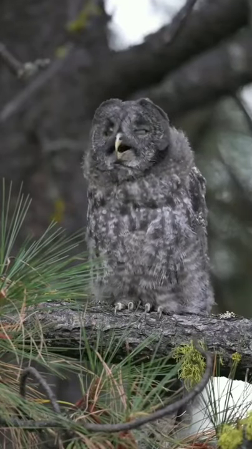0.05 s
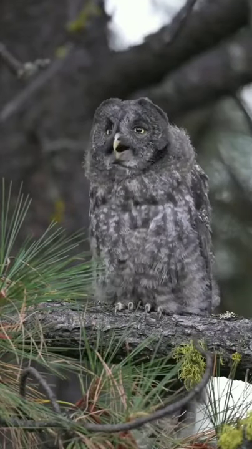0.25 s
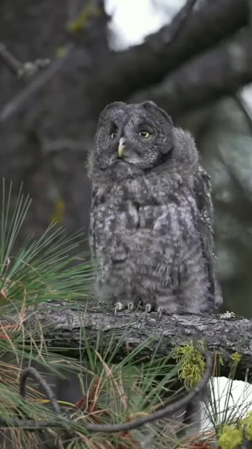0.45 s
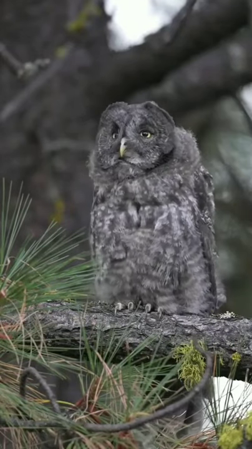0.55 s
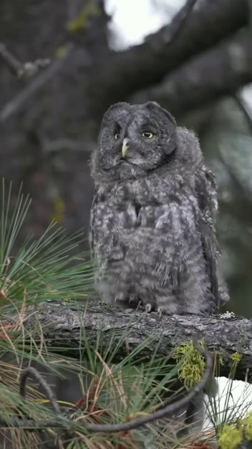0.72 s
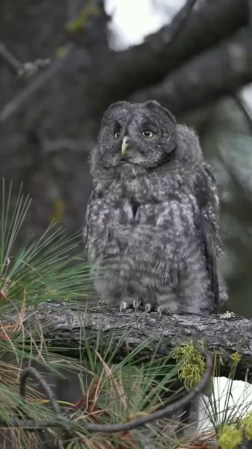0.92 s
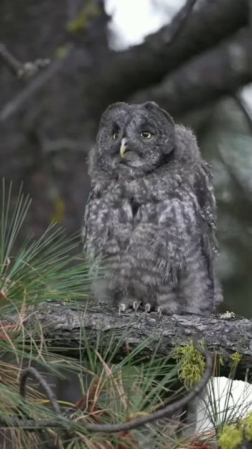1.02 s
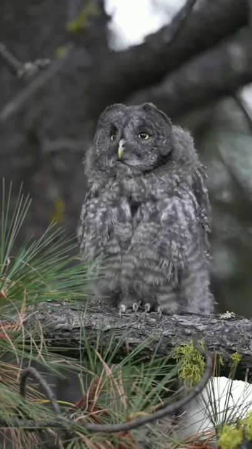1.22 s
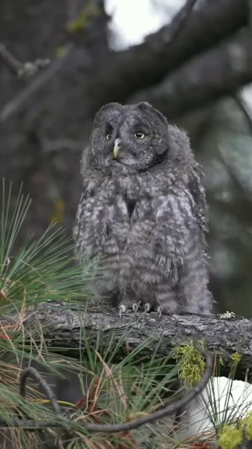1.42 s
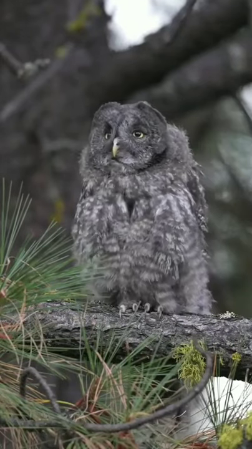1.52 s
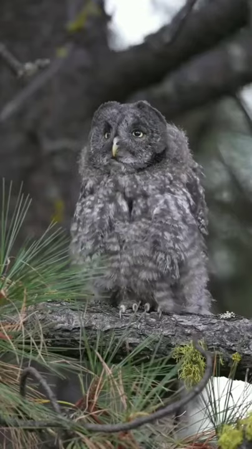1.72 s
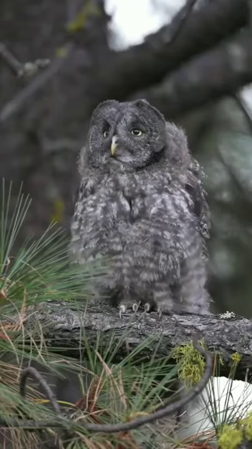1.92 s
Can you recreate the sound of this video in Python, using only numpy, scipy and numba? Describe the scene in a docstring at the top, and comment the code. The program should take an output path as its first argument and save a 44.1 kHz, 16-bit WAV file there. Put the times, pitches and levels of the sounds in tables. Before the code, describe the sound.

One raspy young owl screech rises into a thin squeal in quiet woods.

```python
"""Faint hiss and a low, wavering far-off drone sound throughout. Early on, a young owl gives one rasping
screech from a pine branch, with air hissing through the open beak. Its rough voice climbs slowly, breaks
up into a thin squeal as the odd harmonics fade, and drops away. A very short stereo smear widens the
call's high treble, and the woodland echoes briefly. A slight rustle comes at the end."""
import sys
import numpy as np
from scipy import signal
from scipy.fft import rfft, irfft
from scipy.io import wavfile
from scipy.ndimage import uniform_filter1d, map_coordinates
from numba import njit

SR = 44100
rng = np.random.default_rng(int(sys.argv[2]) if len(sys.argv) > 2 else 0)


def wrap_up_sound(samples):
    """Save the sound to the file named by the first command line argument, as 16-bit audio."""
    columns = np.atleast_2d(samples).T
    # keep every value between -1 and 1, then stretch to whole-number steps
    tamed = np.clip(columns, -1, 1)
    steps = np.round(tamed * 32767).astype(np.int16)
    wavfile.write(sys.argv[1], SR, steps)


N = 85995
TOP_HZ = 12700  # upper band limit

# texture of the voice (time [s], jitter [share of pitch], odd-harmonic gain [dB], air over tone [dB])
VOICE_TEXTURE = [(.17, .04, 18, 3.5), (.22, .06, 3, -3.5), (.355, .052, -1.5, -5), (.368, .025, -14, 0),
                 (.39, .04, -26, -4), (.404, 0.036, -12, -3), (.413, 0.016, -5.5, -3.5),
                 (.432, 0.0246, -10, -9), (.445, 0.0436, -10, -10.5)]


def undb(db):
    """Amplitude ratio of a level in decibels."""
    return 10 ** (np.asarray(db) / 20)


def unit(x):
    """Normalisation to an rms of 1."""
    return x / np.sqrt(np.mean(x ** 2))


def steady(x):
    """Division by the envelope holds the short-term rms near 1."""
    return x / np.sqrt(uniform_filter1d(x ** 2, size=600))


def curve(table, column=1):
    """Linear interpolation of a time table at every sample."""
    rows = np.array(table)
    return np.interp(np.arange(N) / SR, rows[:, 0], rows[:, column])


def freqs():
    """Frequencies of the Fourier bins, at least 1 Hz."""
    return np.maximum(np.arange(N // 2 + 1) * SR / N, 1)


def across(table):
    """Interpolation of a spectrum table over log frequency at every bin."""
    rows = np.array(table)
    return np.interp(np.log(freqs()), np.log(rows[:, 0]), rows[:, 1])


def shape(x, gain):
    """Zero-phase filtering by a gain for every bin."""
    return irfft(rfft(x) * gain, N)


def highpass(hz, order=4):
    """Magnitude response of a maximally flat high-pass."""
    return 1 / np.sqrt(1 + (hz / freqs()) ** (2 * order))


def hump(hz, octaves):
    """Magnitude response of a bell-shaped band-pass."""
    return np.exp(-(np.log2(freqs() / hz) / octaves) ** 2)


def walk(hz):
    """Random modulation: low-passed noise of bandwidth hz and rms 1."""
    return unit(shape(rng.standard_normal(N), np.exp(-(freqs() / hz) ** 2 / 2)))


@njit
def moving_highpass(x, hz):
    """State-variable high-pass: two integrators in a loop, retuned every sample."""
    y = np.empty(len(x))
    band_state, low_state, damping = 0., 0., 1.2
    for i in range(len(x)):
        g = np.tan(np.pi * hz[i] / SR)
        band = (band_state + g * (x[i] - low_state)) / (1 + g * (g + damping))
        low = low_state + g * band
        y[i] = x[i] - damping * band - low
        band_state, low_state = 2 * band - band_state, 2 * low - low_state
    return y


def outdoor_noise(gain):
    """Diffuse stereo noise: the longer the wavelength, the more alike the two sides."""
    # likeness of left and right (frequency [Hz], correlation [ratio])
    coherence = [(40, 1), (130, 0.82), (400, 0.65), (800, 0.11), (2000, 0.067), (8000, 0.072)]
    correlation = across(coherence)
    mid = shape(rng.standard_normal(N), gain * np.sqrt(1 + correlation))
    side = shape(rng.standard_normal(N), gain * np.sqrt(1 - correlation))
    return unit(np.array([mid + side, mid - side]))


def background():
    """Hiss and the rumble under it waver separately by slow amplitude modulation."""
    # background spectrum (frequency [Hz], relative spectral density [dB])
    spectrum = [(15, -59), (25, -25.5), (71, -17), (244, -15), (333, -14.5), (370, -9), (433, -4),
                (481, -11), (676, -22), (1200, -19.5), (1370, -22.5), (1690, -21), (2500, -26.5),
                (3610, -27), (13000, -32)]
    noise = outdoor_noise(undb(across(spectrum))) * undb(-64.5)
    hiss = shape(noise, highpass(hz=116))
    rumble = noise - hiss
    return hiss * undb(0.5 * walk(hz=4.3)) + rumble * undb(1.5 * walk(hz=12))


def drone():
    """Narrow-band noise wavers in pitch and level; a time difference sets it a little to the left."""
    centre_hz, half_width_hz, drift_share, right_lag_s = 434, 15, .03, .00016
    band = outdoor_noise(1 / (1 + ((freqs() - centre_hz) / half_width_hz) ** 2))
    position = np.cumsum(1 + drift_share * walk(hz=3.01))
    sides = [map_coordinates(side, [position - lag_s * SR], mode="mirror")
             for side, lag_s in zip(band, (0, right_lag_s))]
    return np.array(sides) * undb(-69 + walk(hz=5.3))


def harmonics(pitch, phase):
    """The voice's harmonic series: without its odd members the period halves, a squeal an octave up."""
    # lowest two partials (time [s], gain of the fundamental [dB], gain of the second harmonic [dB])
    low_partials = [(.17, 9, 17), (.23, -1.5, -1), (.355, -2, 2), (.37, -5, -1.5), (.4, -13, -16.5),
                    (.416, 4, 0), (.44, 7, -2.5)]
    rise_db = 1.9  # per harmonic, ahead of the throat's filtering
    odd_gain = undb(curve(VOICE_TEXTURE, column=2))
    tone = undb(curve(low_partials)) * odd_gain * np.sin(phase)
    tone += undb(curve(low_partials, column=2)) * np.sin(2 * phase)
    for k in range(3, 13):
        gain = undb(rise_db * k) * (odd_gain if k % 2 else 1)
        tone += gain * (k * pitch < TOP_HZ) * np.sin(k * phase)
    return steady(tone)


def beak_air(note, phase):
    """Turbulent air in the open beak: noise above the pitch, modulated into one puff per cycle."""
    puff_depth, edge_hz = 0.62, 2.25 * note
    puffs = rng.standard_normal(N) * (1 + puff_depth * np.cos(phase))
    air = moving_highpass(moving_highpass(puffs, edge_hz), edge_hz)
    return unit(air) * undb(curve(VOICE_TEXTURE, column=3))


def screech():
    """Source and filter: jittering harmonics and air, coloured by the throat and duller when soft."""
    # slow climb, leap and final drop of the pitch (time [s], frequency [Hz])
    contour = [(.15, 1090), (.178, 1025), (.22, 1105), (.31, 1180), (.361, 1320), (.364, 1650),
               (.382, 1710), (.396, 1660), (.408, 1390), (.415, 1215), (.423, 990), (.44, 780)]
    # effort of the call (time [s], level [dB])
    envelope = [(.149, -68), (.168, -51.5), (.2, -46), (.238, -38.5), (.26, -42), (.284, -38.5),
                (.298, -36), (.32, -39.5), (.348, -34), (.37, -34), (.388, -35), (.414, -32), (.428, -38),
                (.452, -44), (.464, -108)]
    # broad response of throat and beak (frequency [Hz], relative gain [dB])
    vocal_tract = [(300, -76), (520, 5), (760, -7.5), (1080, 2), (1600, -3), (2300, 0.5), (2850, -4.5),
                   (4000, -6.5), (4500, -4.5), (6000, -3.5), (6800, -9), (7300, -14.5), (8500, -16.5),
                   (9200, -24.5), (11300, -28), (13000, -36)]
    full_effort_db, dulling = -27, 0.51  # treble lost per dB below full effort
    note, effort = curve(contour), curve(envelope)
    jitter = walk(hz=904) + .15 * walk(hz=112.3)
    pitch = note * (1 + curve(VOICE_TEXTURE) * jitter)
    phase = 2 * np.pi * np.cumsum(pitch) / SR
    source = harmonics(pitch, phase) + beak_air(note, phase)
    voice = shape(source, undb(across(vocal_tract)))
    edge_hz = 0.88 * note
    voice = moving_highpass(moving_highpass(voice, edge_hz), edge_hz)
    treble = shape(voice, highpass(hz=6480, order=6))
    treble_gain = undb(dulling * np.minimum(effort - full_effort_db, 0))
    voice -= (1 - treble_gain) * treble
    flutter = undb(walk(hz=277))  # 1 dB rms
    t = np.arange(N) / SR
    sounding = (t > envelope[0][0]) & (t < envelope[-1][0])
    return unit(steady(voice) * flutter) * undb(effort) * sounding


def direct_sound(call):
    """Spectral colouring: narrow peaks and notches mark the call on its direct path."""
    # peaks and notches (frequency [Hz], half width [Hz], gain [dB])
    resonances = [(2160, 210, 1.5), (3467, 100, 4.5), (4260, 110, -4), (4330, 37, 10.5), (5110, 49, 7),
                  (5590, 70, 7), (5887, 113, -25), (6030, 33, 9.5), (8350, 150, -1)]
    colour_db = sum(db * np.exp(-((freqs() - hz) / width) ** 2) for hz, width, db in resonances)
    return shape(call, undb(colour_db))


def echoes(fade_s):
    """Exponential decay: a dense stereo echo train of energy 1 a side."""
    t = np.arange(N) / SR
    train = rng.standard_normal((2, N)) * np.exp(-t / fade_s) * (1 - np.exp(-10 * t / fade_s))
    return unit(train) / np.sqrt(N)


def forest(call):
    """Convolution widens the call's high treble and adds reflection from trunks and reverberation."""
    # reverberation of the woodland (frequency [Hz], level [dB], time to decay by 60 dB [s])
    reverberation = [(1000, -14, 1), (2040, -7.5, 0.79), (3850, -14.5, 0.88), (6100, -8, 0.49),
                     (10800, -13, 1)]
    # reflections from farther trees (delay [s], level [dB])
    far_trees = [(0.111, -29), (.375, -35.5)]
    treble_spread = undb(3) * shape(echoes(fade_s=0.003), hump(hz=7440, octaves=0.81))
    trunks = undb(-10.5) * echoes(fade_s=0.019)
    response = treble_spread + trunks
    for hz, db, t60 in reverberation:
        band_share = across([(row[0], float(row[0] == hz)) for row in reverberation])
        response += undb(db) * shape(echoes(fade_s=t60 / np.log(1000)), np.sqrt(band_share))
    for delay_s, db in far_trees:
        response += undb(db) * np.roll(echoes(fade_s=0.0063), int(delay_s * SR), axis=1)
    reflected = signal.fftconvolve(call[None], response[:, :N // 2], axes=1)[:, :N]
    balance = undb([[-0.25], [0.25]])  # slightly louder on the right
    return (direct_sound(call) + reflected) * balance


def rustle():
    """A bell-shaped envelope turns high band noise into a faint, brief rustle."""
    peak_s, half_width_s = 1.945, .03
    swell = np.exp(-((np.arange(N) / SR - peak_s) / half_width_s) ** 2)
    return outdoor_noise(hump(hz=5000, octaves=0.94)) * swell * undb(-69)


def scene():
    """Superposition of the owl in its wood and the quiet sounds around it."""
    return forest(screech()) + background() + drone() + rustle()


def record(dry):
    """Band limiting: a steep elliptic low-pass removes the highest treble."""
    return signal.sosfilt(signal.ellip(10, .2, 80, TOP_HZ, fs=SR, output="sos"), dry)


dry = scene()
out = record(dry)
wrap_up_sound(out)
```